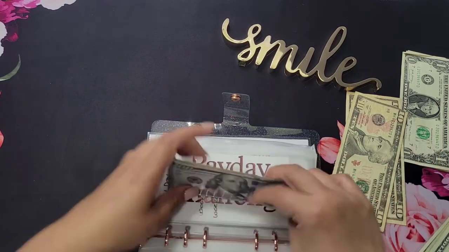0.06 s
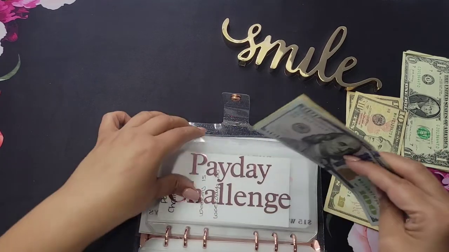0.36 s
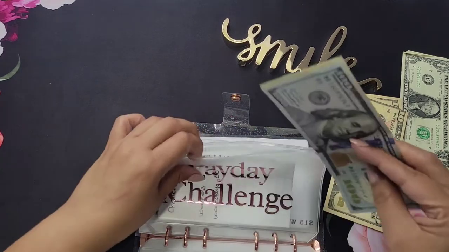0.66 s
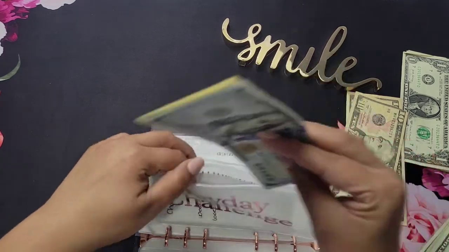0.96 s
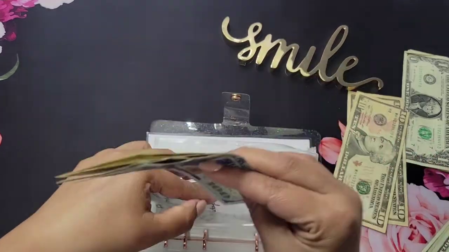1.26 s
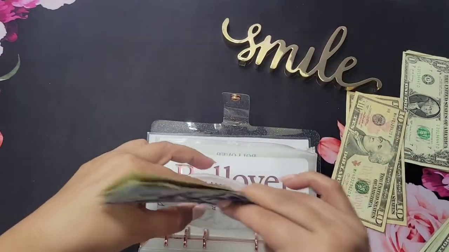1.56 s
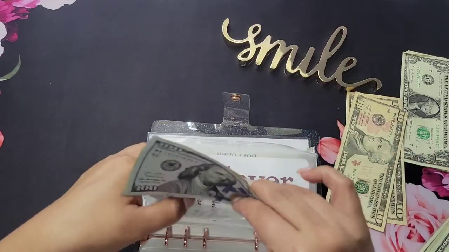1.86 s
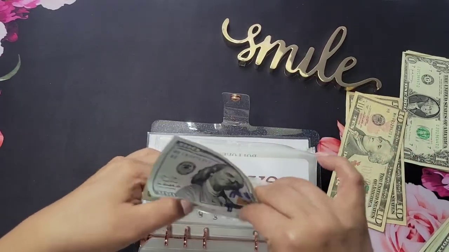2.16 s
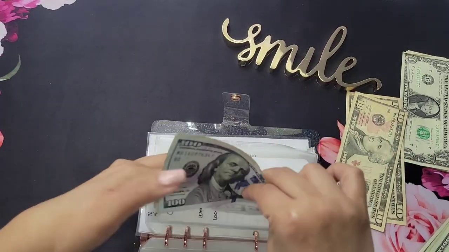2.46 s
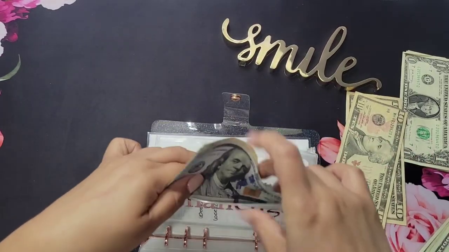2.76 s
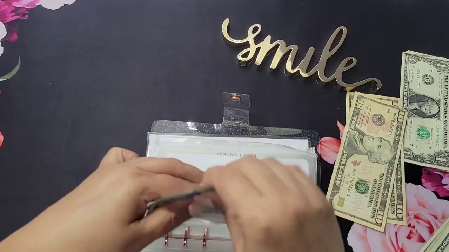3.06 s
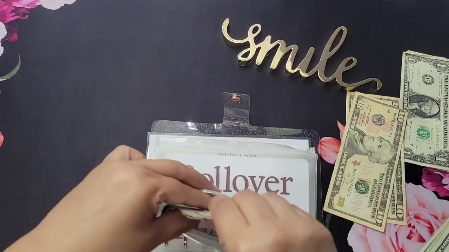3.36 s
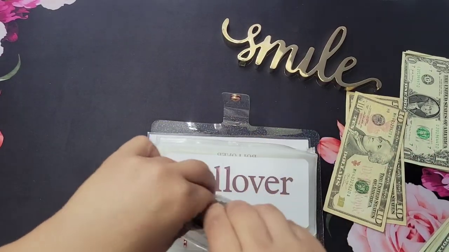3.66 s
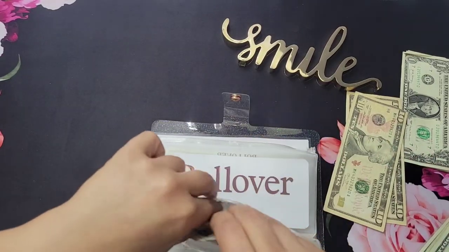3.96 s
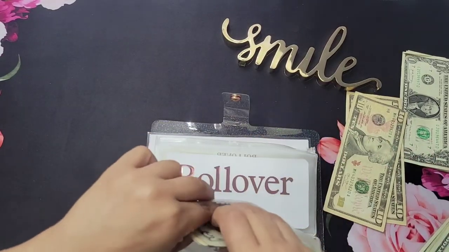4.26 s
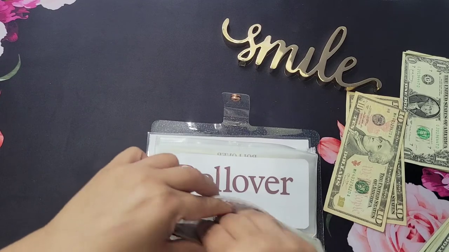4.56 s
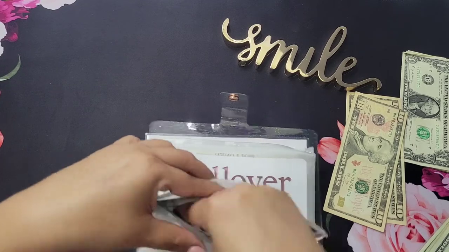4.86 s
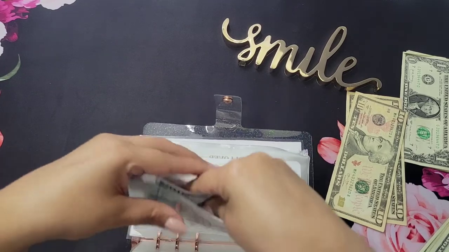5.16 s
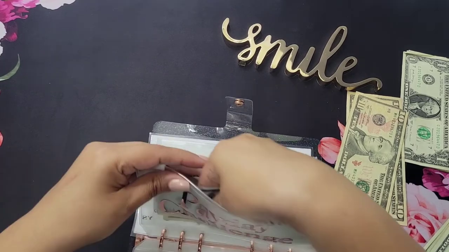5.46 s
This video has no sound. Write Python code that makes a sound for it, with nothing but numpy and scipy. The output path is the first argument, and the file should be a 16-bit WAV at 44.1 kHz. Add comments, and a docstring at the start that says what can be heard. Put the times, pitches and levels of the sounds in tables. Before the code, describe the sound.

A wad of banknotes rustles softly as hands lift and bend it, close to a stereo microphone in a small room. A little before halfway it flicks straight with one loud pop. The notes then slide into a plastic binder sleeve with scrapes, crisp snaps, light knocks and a soft desk bump, crackling most busily near the end. A low hum throbs slowly underneath.

```python
"""Paper rustles softly over a low, slowly throbbing hum: a wad of banknotes is lifted, bent and pushed
into a plastic binder sleeve on a desk, just under a stereo microphone. Paper and plastic crackle as
their fibres catch and slip, creases snap, and hands knock the binder and bump the desk. Once, the bent
wad flicks through with a loud pop. The desk and a small room throw the handling sounds back."""
import sys
import numpy as np
from scipy import signal
from scipy.fft import rfft, irfft, next_fast_len
from scipy.io import wavfile
from scipy.ndimage import uniform_filter1d

SR = 44100
rng = np.random.default_rng(int(sys.argv[2]) if len(sys.argv) > 2 else 0)


def waveform_to_disk(signal):
    """Save audio, clipped to [-1, 1], as 16-bit WAV at the path in sys.argv[1]."""
    frames = np.transpose(np.atleast_2d(signal))
    scaled = np.clip(frames, -1, 1) * 32767
    samples = np.round(scaled).astype(np.int16)
    wavfile.write(sys.argv[1], SR, samples)


N = 247876
FREQS = np.fft.rfftfreq(2048, 1 / SR)
SLEEVE_HZ, NOTE_HZ = 1480, 3300  # where plastic and paper ring when rubbed
STRAIN_S = .005  # a crease strains this long before it cracks

# Rubs and snaps have three bands: body (120-900 Hz), middle (900-4500 Hz) and fizz (above that).
# tone colour of the room air: (frequency [Hz], relative level [dB])
AIR_COLOUR = [(12, -51.5), (20, -1), (44, -14.5), (68, -21), (198, -11.5), (328, -10.5), (718, -29.5),
              (1030, -29), (1480, -16), (2390, -32.5), (3530, -24), (11100, -37), (14700, -32),
              (16000, -47)]
# tone colour of the rumble: (frequency [Hz], relative level [dB])
RUMBLE_COLOUR = [(15, -1.5), (24, -7.5), (33, 6.5), (45, -20), (62, 4), (90, -2.5), (130, -9.5), (190, -17),
                 (400, -25), (1000, -74)]
# sliding strokes of notes and fingers: (time of top speed [s], rise [s], fall [s],
# middle level before the trim [dB], fizz compared with middle [dB], ring of sleeve or note [Hz])
RUB_STROKES = [ (.02, 0.067, 0.024, -71, -2.5, NOTE_HZ), (0.144, 0.038, 0.046, -54.5, -0.5, NOTE_HZ),
               (0.229, 0.015, 0.012, -60.5, 10.5, NOTE_HZ), (.46, 0.16, 0.081, -73, -8.5, SLEEVE_HZ),
               (.645, 0.029, 0.055, -61.5, -27, NOTE_HZ), (.83, 0.13, 0.087, -62, -6.5, NOTE_HZ),
               (1.02, 0.086, 0.1, -70.5, -8, SLEEVE_HZ), (1.133, 0.011, 0.017, -61, -8.5, NOTE_HZ),
               (1.235, 0.025, 0.033, -57.5, -7, NOTE_HZ), (1.513, 0.0079, 0.012, -64.5, -16.5, SLEEVE_HZ),
               (1.63, 0.029, 0.034, -64, -4, SLEEVE_HZ), (1.75, 0.11, 0.023, -68.5, 2.5, SLEEVE_HZ),
               (1.95, 0.071, 0.03, -70.5, 4, NOTE_HZ), (2.11, 0.11, 0.12, -68, -8.5, SLEEVE_HZ),
               (2.215, 0.019, 0.025, -47.5, -5, NOTE_HZ), (2.34, 0.09, 0.076, -56.5, 0, SLEEVE_HZ),
               (2.484, 0.019, 0.011, -61, 8, SLEEVE_HZ), (2.563, .015, 0.021, -67.5, 16.5, NOTE_HZ),
               (2.694, .01, 0.013, -54, -2, SLEEVE_HZ), (2.85, 0.13, 0.052, -57.5, -8, NOTE_HZ),
               (2.96, 0.071, .08, -65.5, 6.5, NOTE_HZ), (3.109, 0.072, 0.069, -58, -1, NOTE_HZ),
               (3.294, 0.039, 0.049, -51, -1.5, NOTE_HZ), (3.57, 0.15, 0.084, -61, -4.5, SLEEVE_HZ),
               (3.76, 0.15, 0.092, -62, -6.5, SLEEVE_HZ), (3.905, 0.036, 0.028, -63.5, -21, SLEEVE_HZ),
               (4.1, 0.061, 0.076, -55.5, -9, NOTE_HZ), (4.5, 0.18, 0.069, -64.5, -4, SLEEVE_HZ),
               (4.575, 0.052, 0.014, -52.5, -6, SLEEVE_HZ), (4.678, 0.031, 0.013, -46, 0, SLEEVE_HZ),
               (4.755, 0.031, 0.034, -45, -2, NOTE_HZ), (4.869, 0.041, 0.018, -44, -4.5, NOTE_HZ),
               (4.96, 0.071, 0.045, -58, -3, SLEEVE_HZ), (5.064, 0.017, 0.014, -50, -5.5, NOTE_HZ),
               (5.13, 0.03, 0.35, -67.5, -6.5, SLEEVE_HZ), (5.48, 0.042, 0.18, -57.5, -2, SLEEVE_HZ),
               (5.6, 0.036, .04, -60.5, -9, SLEEVE_HZ)]
# tone colour of rubbed paper: (frequency [Hz], relative level [dB])
PAPER_COLOUR = [(120, -12.5), (230, -6), (400, -2), (700, -4.5), (1000, -2.5), (1500, 2), (2200, -1),
                (3300, -2), (4500, -7), (6000, -12.5), (8000, -14), (11000, -23.5), (15500, -32)]
# creases and sleeve edges snap: (time [s], middle level [dB], fizz compared with middle [dB], ring [Hz])
CREASE_SNAPS = [(0.047, -64.5, -22, 1220), (0.6635, -53.5, -20, 3230), (0.6741, -53.5, -11, 3350),
                (1.2186, -54, -26, 1870), (1.2334, -46, -6.5, 1580), (1.4276, -62, -4.5, 4840),
                (1.769, -54.5, -3, 1510), (1.8463, -67.5, -18, 1640), (2.2105, -52.5, -15, 3900),
                (2.832, -47.5, -11, 3870), (2.8586, -55.5, -25, 2550), (2.9407, -57.5, -8, 2820),
                (2.966, -55.5, -8, 720), (3.038, -54.5, -3, 1460), (3.0984, -44, -0.5, 3120),
                (3.2856, -46.5, -1, 1460), (3.474, -56.5, -9.5, 1430), (3.5531, -35.5, -9.5, 1670),
                (3.6056, -52.5, -8, 1310), (3.909, -49.5, -19, 2300), (4.1194, -53, 2, 730),
                (4.365, -57.5, -4, 1430), (4.6657, -42, -7, 1220), (4.7103, -52, 1.5, 890),
                (4.743, -34.5, 4.5, 3260), (4.745, -35.5, -4, 1390), (4.7932, -39.5, -18, 1590),
                (4.8389, -43.5, -2.5, 1170), (5.2397, -59.5, -29, 2380), (5.2987, -46.5, -19, 1340),
                (5.409, -56.5, -28, 1300), (5.4451, -45.5, -8, 3200), (5.462, -45.5, -16, 1150),
                (5.558, -44.5, -1.5, 2780), (5.6149, -52.5, -23, 1300)]
# tone colour of a snapping crease: (frequency [Hz], relative level [dB])
CREASE_COLOUR = [(120, 6), (230, -19), (350, -1.5), (700, 0.5), (1300, 3), (2400, 0), (3600, 1),
                 (5000, -2.5), (7000, -5), (10000, -10.5), (16000, -22.5)]
# a fingertip or note edge drags: (start [s], length [s], top level [dB], pitch [Hz], filter width [Hz])
EDGE_DRAGS = [(0.19, 0.038, -52, 4050, 6000), (0.66, 0.052, -62.5, 430, 400),
              (0.798, 0.088, -55, 2540, 2960), (0.812, 0.058, -61, 455, 397),
              (0.869, 0.055, -62, 3370, 1100), (0.969, .046, -67, 2540, 603),
              (1.129, 0.08, -66.5, 1470, 900), (2.01, 0.17, -63, 1450, 516), (2.037, 0.22, -61.5, 520, 600),
              (2.199, 0.044, -47.5, 6800, 11100), (2.444, 0.056, -54, 1570, 700),
              (2.546, 0.026, -53, 6160, 5000), (2.564, 0.11, -56, 1720, 1590),
              (2.905, 0.022, -55, 556, 700), (3.279, .041, -42, 1480, 1300),
              (3.315, 0.092, -53, 1520, 1320), (3.403, 0.048, -55, 1470, 500),
              (3.457, 0.034, -52, 1440, 600), (4.08, 0.18, -64, 3640, 455), (4.547, 0.055, -59, 1880, 1600),
              (4.645, 0.12, -48.5, 1080, 1290), (4.773, 0.035, -43, 1230, 1350),
              (4.843, 0.035, -48, 3560, 3000), (5.49, 0.017, -52.5, 1180, 400),
              (5.603, .026, -50, 1330, 400)]
# knuckles and wad knock on the binder, and the desk takes a soft low thud near 3.95 s: (time [s], level [dB],
# pitch [Hz])
KNOCKS = [(.2175, -52, 437), (1.288, -62, 278), (2.21, -55, 620), (2.832, -59, 676),
          (2.966, -49.5, 770), (3.04, -57.5, 586), (3.1, -53.5, 450), (3.95, -57, 129),
          (3.967, -51, 132), (4.06, -57, 115), (4.1204, -50, 400), (4.12, -48, 750),
          (4.745, -49.5, 390), (5.1247, -61, 497)]
# hands and binder bump the desk: (time [s], peak level [dB], pitch [Hz], length [s])
DESK_BUMPS = [(1.25, -61, 86.7, 0.21), (3.959, -40.5, 57.5, .128), (3.992, -49, 36, 0.086),
              (4.055, -47, 67.6, 0.074), (4.124, -50, 55.7, 0.25)]
# the cracks that make up the wad's pop: (time [s], level [dB], fade time [s])
FLICK_CRACKS = [(2.309, -35.5, 0.0014), (2.3121, -25, 0.00142), (2.3193, -48, 0.0036)]
# the pitches the wad rings at: (pitch [Hz], width [Hz], relative level [dB])
WAD_RINGS = [(500, 110, 1.5), (780, 76, 8), (915, 120, 1.5), (1160, 74, 11.5), (2180, 84, -1),
             (2320, 150, 8.5), (3500, 190, -0.5), (3900, 490, 0), (4950, 330, -4), (6640, 1600, -5)]
# how long the room echoes: (frequency [Hz], time to fade by 60 dB [s])
ROOM_FADE = [(200, 0.11), (800, 0.15), (2000, 0.15), (5500, 0.13), (15000, 0.13)]


def amp(db):
    """Turns decibels into a gain."""
    return 10 ** (np.asarray(db) / 20)


def unit(x):
    """Scales a signal to an average power of 1."""
    return x / np.sqrt(np.mean(x ** 2) + 1e-20)


def read(points, hz):
    """Reads between the rows of a frequency table, giving each octave equal room."""
    table_hz, value = np.transpose(points)
    return np.interp(np.log(hz + 1), np.log(table_hz + 1), value)


def add(mix, s, sound):
    """Mixes a sound in, starting at s seconds."""
    part = mix[..., max(round(s * SR), 0):][..., :sound.shape[-1]]
    part += sound[..., :part.shape[-1]]


def click(colour):
    """A sharp-fronted click of energy 1 with this tone colour; it also serves as a filter."""
    log_gain = np.log(np.maximum(colour / colour.max(), 1e-5))
    mirrored = np.concatenate([log_gain, log_gain[-2:0:-1]])
    spectrum = np.exp(signal.hilbert(mirrored).conj())  # packs the energy at the start
    taps = np.fft.ifft(spectrum).real[:len(colour)]
    return taps / np.linalg.norm(taps)


def three_bands(points, edges_hz=(120, 900, 4500)):
    """Splits a tone colour into middle, body and fizz, each of power 1."""
    over_low, over_mid, over_high = (1 / (1 + (hz / (FREQS + 1)) ** 8) for hz in edges_hz)
    shares = [over_mid * (1 - over_high), over_low * (1 - over_mid), over_high]
    return [unit(amp(read(points, FREQS)) * np.sqrt(share)) for share in shares]


def resonate(x, hz, width_hz):
    """Makes a signal ring at one pitch; a narrower ring lasts longer."""
    turn = np.exp(2j * np.pi * hz * np.arange(len(x)) / SR)
    decay = np.exp(-np.pi * width_hz / SR)
    return 2 * (turn * signal.lfilter([1 - decay], [1, -decay], x / turn)).real


def hum(hz=58.735, beat_s=1.723, swell_at_s=.649, start_db=-58.5, upper_db=-2, sink_db_per_s=.15):
    """Two close low tones drift in and out of step, so the hum throbs while it slowly sinks."""
    t = np.arange(N) / SR
    upper, lower = (np.cos(2 * np.pi * (hz + side * .5 / beat_s) * (t - swell_at_s)) for side in (1, -1))
    return amp(start_db - sink_db_per_s * t) * (unit(lower) + amp(upper_db) * unit(upper))


def steady_noise(points, alike):
    """Coloured noise; alike (0 to 1) is the share of its power common to both microphones."""
    shared, *own = rng.standard_normal((3, N))
    white = np.sqrt(alike) * shared + np.sqrt(1 - alike) * np.array(own)
    size = next_fast_len(N)
    colour = amp(read(points, np.fft.rfftfreq(size, 1 / SR)))
    return irfft(rfft(white, size) * colour, size)[:, :N]


def room_air(air_db=-77.5, rumble_db=-66):
    """Faint room air hisses over a steady rumble."""
    bass_cut = signal.butter(4, 160, "high", fs=SR, output="sos")
    air = signal.sosfilt(bass_cut, steady_noise(AIR_COLOUR, alike=.25))
    rumble = steady_noise(RUMBLE_COLOUR, alike=.72)
    return amp(air_db) * unit(air) + amp(rumble_db) * unit(rumble)


def sliding(shape=1.1, rest_db=-83, rest_fizz_db=-11, body_even_db=-71.5, body_growth=.64):
    """Strokes swell and fade. Gives their level, body and fizz against it (all dB), and the notes' share."""
    t = np.arange(0, N, 32) / SR
    s, rise_s, fall_s, level_db, fizz_db, ring_hz = np.transpose(RUB_STROKES)[:, :, None]
    from_peak = np.maximum((s - t) / rise_s, (t - s) / fall_s)
    power = (amp(level_db) * np.exp(-from_peak ** shape)) ** 2
    rest = amp(rest_db) ** 2  # resting fingers never lie quite still
    total = power.sum(0) + rest
    fizz = ((power * amp(fizz_db) ** 2).sum(0) + rest * amp(rest_fizz_db) ** 2) / total
    on_notes = (power * (ring_hz == NOTE_HZ)).sum(0) / total
    total_db = 10 * np.log10(total)
    body_db = (body_growth - 1) * (total_db - body_even_db)  # the body grows more slowly than the middle
    curves = total_db, body_db, 10 * np.log10(fizz), on_notes
    return [np.interp(np.arange(N) / SR, t, curve) for curve in curves]


def friction(slips_per_s=1100, spread_db=4.5, grainy=.74, flutter_db=.38):
    """Fibres catch and slip: a smooth hiss with clicks of all sizes, under uneven finger pressure."""
    slips = (rng.random(N) < slips_per_s / SR) * rng.choice([-1, 1], N)
    sizes = amp(spread_db * np.minimum(rng.exponential(1, N), 4.5))
    crackle = np.sqrt(grainy) * unit(slips * sizes) + np.sqrt(1 - grainy) * rng.standard_normal(N)
    pressure = unit(uniform_filter1d(rng.standard_normal(N), size=500))
    return unit(crackle * amp(flutter_db * pressure))


def rubbing(trim_db=-1, sizzle_hz=9500, sizzle_db=-9, sizzle_growth=.77):
    """Friction rings whatever is being rubbed: the plastic sleeve narrowly, the paper notes broadly."""
    level_db, body_db, fizz_db, on_notes = sliding()
    drive = friction()
    middle, body, fizz = (signal.oaconvolve(drive, click(band))[:N] for band in three_bands(PAPER_COLOUR))
    sleeve = unit(.64 * middle + .36 * unit(resonate(friction(), SLEEVE_HZ, width_hz=180)))
    notes = unit(.59 * middle + .41 * unit(resonate(friction(), NOTE_HZ, width_hz=1260)))
    middle = unit((1 - on_notes) * sleeve + on_notes * notes)
    treble_only = signal.butter(4, sizzle_hz, "high", fs=SR, output="sos")
    sizzle = unit(signal.sosfilt(treble_only, friction()))
    fizz += amp(sizzle_db + sizzle_growth * np.minimum(fizz_db, 10)) * sizzle  # fast slides reach higher
    return amp(level_db + trim_db) * (middle + amp(body_db) * body + amp(fizz_db) * fizz)


def desk_paths(scatter_db, fade_s, lag_s=.00007):
    """Sound reaches the microphones directly, left first, then bounces off hands, binder and desk."""
    t = np.arange(1024) / SR
    paths = rng.standard_normal((2, len(t))) * np.exp(-t / fade_s) * (t > 2 * lag_s)
    paths *= amp(scatter_db) / np.linalg.norm(paths, axis=1, keepdims=True)
    paths[0, 0] += 1
    paths[1, round(lag_s * SR)] += 1
    return paths / np.linalg.norm(paths[0])


def even_out(paths, evenness=.72):
    """Flattens the tone of echoes, so they smear a click in time but barely colour it."""
    power = abs(rfft(paths, 2048)) ** 2
    gains = np.sqrt(uniform_filter1d(power, size=7) + 1e-9)
    smear = np.array([signal.fftconvolve(path, click(gain ** -evenness))[:2048]
                      for path, gain in zip(paths, gains)])
    return smear / np.linalg.norm(smear, axis=1, keepdims=True)


def moving_hands(x, count=12, rounds_per_s=.9):
    """Moving hands change the echoes: the sound fades from one set of paths to the next, in a circle."""
    place = np.arange(N) / SR * rounds_per_s * count
    out = np.zeros((2, N))
    for k in range(count):
        away = abs((place - k) % count - count / 2)
        fade = np.cos(np.pi / 2 * np.minimum(away, 1))
        paths = even_out(desk_paths(scatter_db=7.5, fade_s=.0044), evenness=.52)
        out += signal.oaconvolve((x * fade)[None], paths, axes=1)[:, :N]
    return out


def room_echo(x, wet_db=-9, gap_s=.006):
    """The small room adds a short wash of echoes, each band dying at its own speed."""
    hz, t, bands = signal.stft(rng.standard_normal((2, SR // 2)), SR, nperseg=256)
    fade = amp(-60 * t / read(ROOM_FADE, hz)[:, None])
    tail = signal.istft(bands * fade, SR, nperseg=256)[1]
    tail *= np.arange(tail.shape[1]) > gap_s * SR
    return amp(wet_db) * signal.fftconvolve(x, tail / np.linalg.norm(tail[0]), axes=1)[:, :N]


def crack(fade_s, colour, paths, spike=3.6, strain=.12, strain_rise_s=.0026):
    """A strain, a crack, then a run of smaller cracks; the 10 ms from the crack on have power 1."""
    lead = round(STRAIN_S * SR)
    t = (np.arange(1024) - lead) / SR
    swell = np.where(t < 0, strain * np.exp(-abs(t) / strain_rise_s), np.exp(-abs(t) / fade_s))
    run = rng.standard_normal(len(t)) * swell
    run[lead] = spike
    scattered = even_out(signal.fftconvolve(run[None], paths, axes=1))
    sound = signal.fftconvolve(scattered, click(colour)[None], axes=1)
    return sound / np.sqrt(np.mean(sound[:, lead:lead + SR // 100] ** 2))


def crease_snaps(buckle_s=.00091, ring_db=6, ring_width=.15, body_at_1khz_db=-2.5, db_per_octave=-11):
    """A crease buckles and rings the patch around it; smaller patches ring higher, with less body."""
    out = np.zeros((2, N))
    middle, body, fizz = three_bands(CREASE_COLOUR)
    for s, level_db, fizz_db, ring_hz in CREASE_SNAPS:
        body_db = body_at_1khz_db + db_per_octave * np.log2(ring_hz / 1000)
        ring = 1 + (amp(ring_db) - 1) / (1 + ((FREQS / ring_hz - 1) / ring_width) ** 2)
        bands = [(middle, 0), (body, body_db), (fizz, fizz_db)]
        power = sum((amp(db) * unit(band * ring)) ** 2 for band, db in bands)
        snap = crack(buckle_s, np.sqrt(power), desk_paths(scatter_db=7, fade_s=.005))
        add(out, s - STRAIN_S, amp(level_db) * np.sqrt(power.mean()) * snap)
    return out


def edge_drags():
    """A dragging fingertip or note edge whispers: friction swells and fades in one band of the sheet."""
    out, drive = np.zeros(N), friction(grainy=.7)
    for s, length_s, level_db, hz, width_hz in EDGE_DRAGS:
        stroke = drive[round(s * SR):][:round(length_s * SR)]
        band = resonate(resonate(stroke, hz, width_hz), hz, width_hz)
        swell = np.sin(np.linspace(0, np.pi, len(band)))
        add(out, s, amp(level_db) * unit(band) * swell)
    return out


def knocks(ring_width=.43, fade_s=.0034):
    """Each knock answers with one dull ring that dies quickly: the soft binder rings higher, the bumped desk
    low."""
    out = np.zeros((2, N))
    for s, level_db, hz in KNOCKS:
        ring = 1 / (1 + (2 * (FREQS / hz - 1) / ring_width) ** 2)
        knock = crack(fade_s, ring, desk_paths(scatter_db=-11.5, fade_s=.015))
        add(out, s - STRAIN_S, amp(level_db) * knock)
    return out


def desk_bumps():
    """Soft pushes rock the desk for a few swings."""
    out = np.zeros(N)
    for s, peak_db, hz, length_s in DESK_BUMPS:
        t = np.arange(round(length_s * SR)) / SR
        swell = np.sin(np.pi * t / length_s)
        add(out, s, amp(peak_db) * swell * np.sin(2 * np.pi * hz * t))
    return out


def wad_flick(crease_db=-12, bass_edge_hz=560):
    """The bent wad slips off the thumb and slaps straight, ringing at several pitches in one loud pop."""
    power = sum(amp(db) ** 2 / (1 + (2 * (FREQS - hz) / width) ** 2) for hz, width, db in WAD_RINGS)
    power += amp(crease_db + read(CREASE_COLOUR, FREQS) / 2) ** 2
    power /= 1 + (bass_edge_hz / (FREQS + 1)) ** 8  # a small sheet gives off little bass
    out = np.zeros((2, N))
    for s, level_db, fade_s in FLICK_CRACKS:
        paths = desk_paths(scatter_db=0, fade_s=.005)  # held in the open, it sounds drier than the snaps
        add(out, s - STRAIN_S, amp(level_db) * crack(fade_s, np.sqrt(power), paths))
    return out


def scene(bass_lean_db=1.1):
    """Paper and plastic in the room; the hum and the bumps lean a little to the right."""
    handling = moving_hands(rubbing() + edge_drags()) + crease_snaps() + wad_flick() + knocks()
    bass = (hum() + desk_bumps()) * amp([[-bass_lean_db], [bass_lean_db]])
    return handling + room_echo(handling) + bass + room_air()


def record(dry, cutoff_hz=16200):
    """Cuts away the very highest treble."""
    treble_cut = signal.firwin(401, cutoff_hz, window=("kaiser", 8), fs=SR)
    return signal.oaconvolve(dry, treble_cut[None], "same")


dry = scene()
out = record(dry)
waveform_to_disk(out)
```